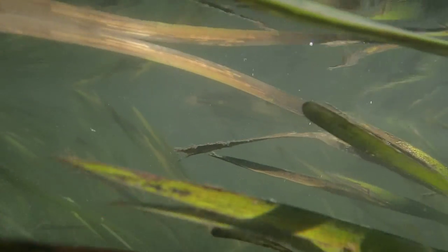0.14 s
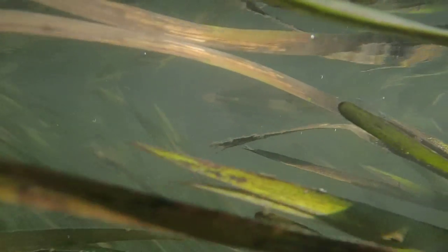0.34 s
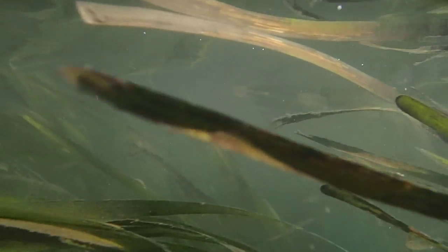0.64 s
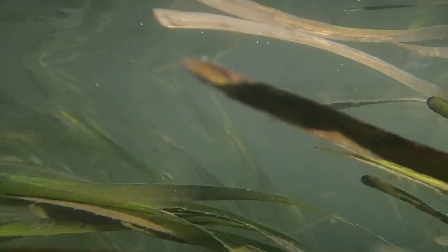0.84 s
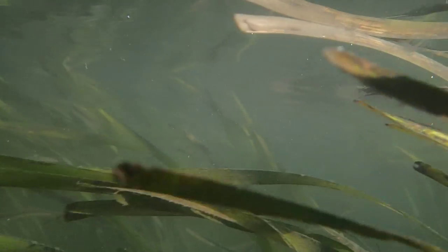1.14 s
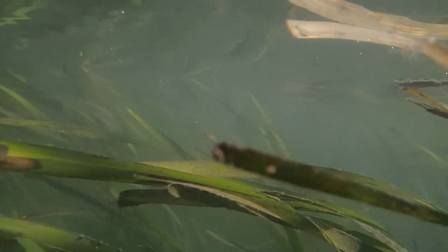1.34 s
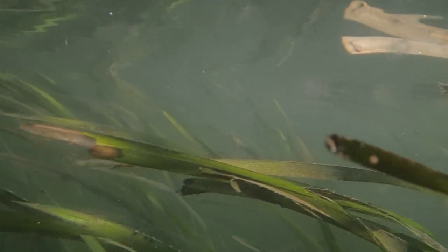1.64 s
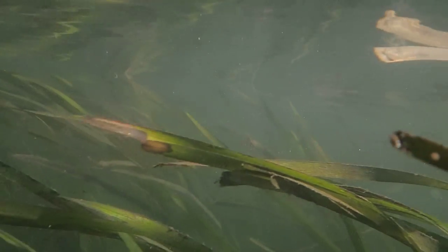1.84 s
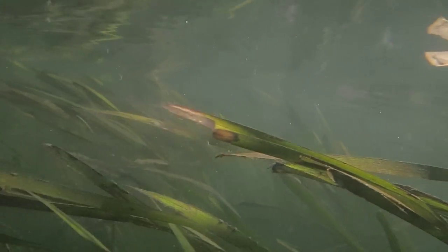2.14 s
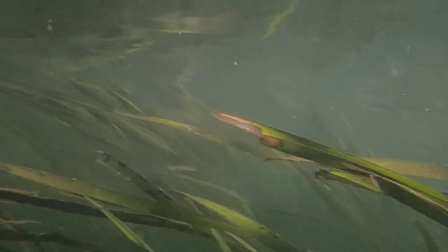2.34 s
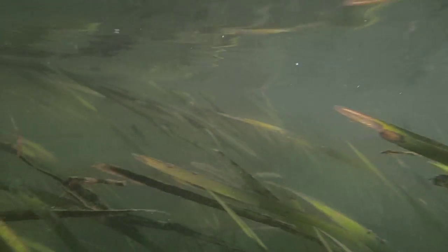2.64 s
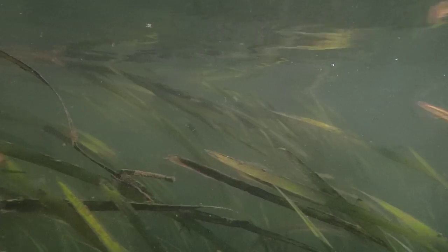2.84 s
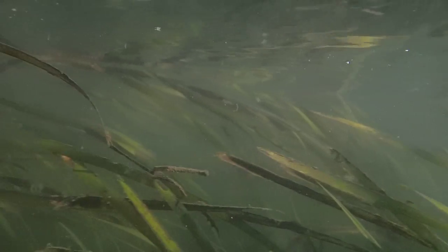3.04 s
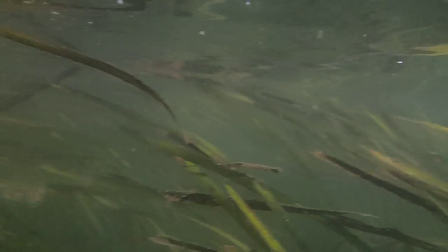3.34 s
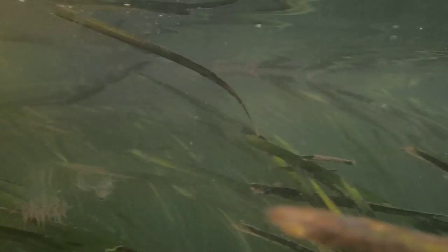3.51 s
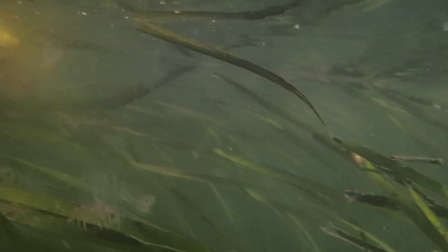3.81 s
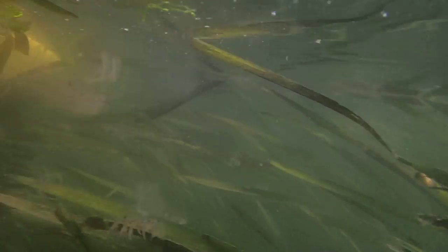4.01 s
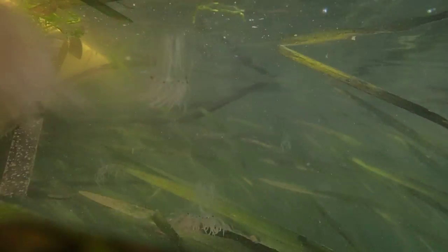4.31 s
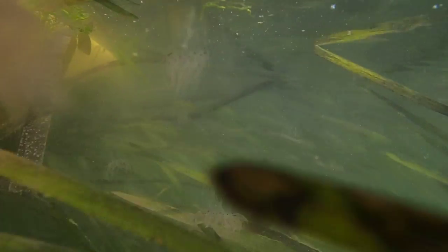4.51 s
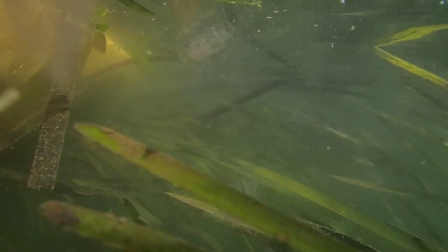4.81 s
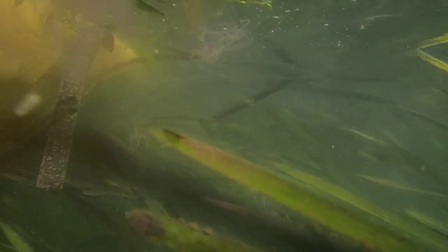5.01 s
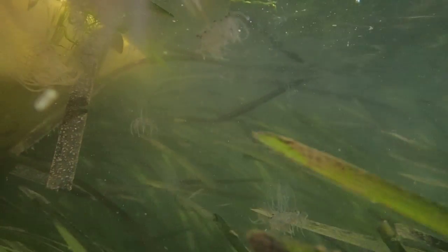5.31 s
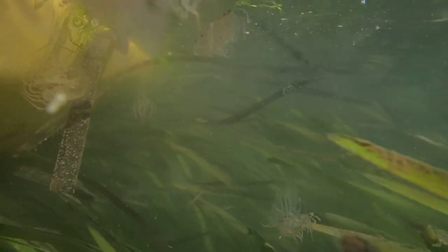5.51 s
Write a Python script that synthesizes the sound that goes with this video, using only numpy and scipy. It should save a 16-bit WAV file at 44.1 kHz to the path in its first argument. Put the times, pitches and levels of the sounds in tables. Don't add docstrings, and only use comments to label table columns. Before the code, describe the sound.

Close stereo microphones in a submerged camera hear mostly their own machine: a steady boxy hum, rapid shuddering ticks, thin whine and light hiss, stronger on the right. Long grass leans on the case with low thuds and brief rumbling scrapes. Sharp plasticky knocks come at about 2.4 and 2.8 seconds, with momentary drops in level. Deeper sweeps and small taps follow, ending with the motor still fluttering.

```python
import sys
import numpy as np
from scipy import signal
from scipy.io import wavfile
from scipy.ndimage import uniform_filter1d

SR = 44100
rng = np.random.default_rng(int(sys.argv[2]) if len(sys.argv) > 2 else 0)


def unload_audio(sound):
    columns = np.transpose(np.atleast_2d(sound))
    steps = np.round(np.clip(columns, -1, 1) * 32767)
    wavfile.write(sys.argv[1], SR, steps.astype(np.int16))


def linear_from_db(decibels):
    return 10 ** (np.asarray(decibels, float) / 20)


N = 249606

HISS_DB = [-57.8, -54.2]
# frequency in Hz, level in dB per Hz.
HISS_COLOUR = [(500, 2), (2500, 5), (3300, 4), (5000, 1.5), (6300, 3), (7300, 3.5), (8000, 0), (16000, -1)]

# frequency in Hz, level in dB per Hz.
PUSH_COLOUR = [(15, -32), (30, -17), (60, -2), (90, 9), (140, -15), (250, -38)]
# frequency in Hz, level in dB per Hz.
RUMBLE_COLOUR = [(50, -52), (100, -9.5), (175, 2.1), (260, -4.5), (400, -2), (800, -15)]
# frequency in Hz, level in dB per Hz.
SCRAPE_COLOUR = [(700, 1), (1300, 10.5), (1900, 3.5), (3100, -2.5), (4500, -11.5), (9000, -8)]
# middle in seconds, half length in seconds, rumble in dB, scrape in dB.
SWEEPS = [(.45, 0.26, -72, -67), (0.726, 0.013, -36, -49), (.755, 0.0096, -40, -63),
          (0.78, 0.077, -41.5, -56), (0.993, 0.066, -47, -65), (1.75, 0.58, -53, -69),
          (2.1, 0.052, -60, -71), (2.693, 0.035, -42, -70), (2.87, 0.1, -34.5, -74), (3.2, 0.13, -43, -71),
          (3.54, 0.14, -28.5, -59), (3.965, .15, -49, -82), (4.193, 0.18, -30.5, -57.5),
          (4.735, 0.14, -36.5, -63), (4.912, 0.041, -38, -63), (5.13, 0.092, -44, -71)]
PUSH_DB, STILL_SCRAPE_DB = -61.5, -62

# start in seconds, level in dB, left over right in dB.
BUMPS = [(0.327, -49, -12.0), (0.527, -39, 18.5), (0.652, -34, 26.0), (0.723, -30.5, 7), (0.764, -28, -24),
         (0.993, -39, 0), (1.949, -51, 6), (2.084, -36, -13), (2.34, -43, -10), (2.678, -40, 2.5),
         (2.779, -38, 8), (2.921, -34, -16), (3.419, -46, 5.5), (3.571, -37, 18.0), (4.046, -45, 7.0),
         (4.256, -55, 11.5), (4.95, -47, -2)]

# start in seconds, ring in dB, crack in dB, tick in dB.
KNOCKS = [
    (2.4412, -6, -29, -30),
    (2.8082, -9, -30, -50),
    (2.857, -6, -20, -39),
    (2.986, -50, -56, -45),
    (4.6679, -18, -26, -31.5),
]
# start in seconds, crack in dB, ring in dB.
TAPS = [(1.0199, -34.5, -28), (2.700, -54, -21.5), (3.115, -37, -29), (3.8845, -50, -42),
        (4.1717, -34, -24), (4.7648, -46, -29), (5.0666, -37, -40), (5.342, -46, -43), (5.405, -34, -40),
        (5.5627, -41, -49)]
# start in seconds, level in dB, low note in Hz, high note in Hz.
SNAPS = [
    (.727, -46, 1850, 2600),
    (2.4413, -19.5, 1960, 3050),
    (2.8086, -33, 2250, 2800),
    (2.8568, -25.5, 2340, 2700),
    (4.6686, -43, 2300, 3000),
]
# frequency in Hz, level in dB, time to fade by 60 dB in seconds.
CRACK = [(1180, 4.7, 0.0071), (1600, -2, 0.0043)]
# frequency in Hz, level in dB, time to fade by 60 dB in seconds.
TICK = [(4570, -5, 0.0044), (6700, 0.5, 0.0037), (11000, -9, .002)]
# frequency in Hz, level in dB, time to fade by 60 dB in seconds.
THUMP = [(180.6, -1, 0.064)]
# frequency in Hz, level in dB, time to fade by 60 dB in seconds.
RING_LEFT = [(470, -4.5, 0.066), (760, -13, 0.021)]
# frequency in Hz, level in dB, time to fade by 60 dB in seconds.
RING_RIGHT = [(464, -2., 0.091), (776, 5.5, 0.011)]
TAP_TICK_DB = -22.0
THUMP_SHARE, THUMP_DB = 0.7, -7.5
SNAP_T60_S, LOW_NOTE_DB = 0.0053, -5

PICTURES_PER_S = 30000 / 1001
RESTS = [1, 3, 9, 11, 20, 29, 35, 37, 39, 72, 74, 76, 98, 101, 103, 105, 110, 112, 156, 158, 160, 162, 164,
         167, 169]
# time in seconds, start tick in dB, settling shudder in dB.
LOAD = [(0, -37, -36), (.8, -30.5, -33.5), (1.6, -29.5, -31), (2.4, -32.5, -29.5), (2.7, -33.5, -30),
        (3.5, -30, -27), (4, -31.5, -23.5), (5., -29, -22.5), (5.3, -27, -27), (5.66, -26.5, -27.5)]
# frequency in Hz, level in dB, time to fade by 60 dB in seconds.
START_MODES = [(587, -1., .045), (850, 0.1, .013), (1048, -1., .03)]
# frequency in Hz, level in dB, time to fade by 60 dB in seconds.
SETTLE_MODES = [(586.3, 0.1, .1), (740, -12, .03), (1030, -12.5, 0.034), (1285, -14.5, .04)]
WHINE_DB = [-71.5, -53]
WHINE_HZ = 7520
CASE_EDGE_HZ = 1250

# time in seconds, level in dB, main resonance in Hz.
HUM = [(0, -28.5, 470), (.25, -26.5, 510), (.55, -29, 457), (1.15, -27.5, 437), (1.6, -29.5, 448),
       (1.85, -28.5, 483), (2.15, -28.5, 449), (2.7, -28, 465), (3.3, -29, 439), (4.0, -27.5, 444),
       (4.4, -28, 432), (4.9, -27, 431), (5.3, -27.5, 464), (5.66, -26.5, 448)]
# frequency in Hz, level in dB per Hz.
HUM_COLOUR = [(90, -27.5), (150, -18), (190, -13), (280, -12), (400, -3.5), (452, 3.5), (520, -5),
              (600, -9), (680, -14), (875, -26.5), (1060, -26.5), (1200, -38), (1460, -47.5), (2400, -51.5)]
# time in seconds, level in dB.
DRONE = [(0, -52), (.5, -55), (.7, -68), (2.4, -56.5), (3.2, -54), (5.66, -72)]
# frequency in Hz, level in dB per Hz.
DRONE_COLOUR = [(95, -53), (112, -17), (119, 0.1), (126, -6), (150, -21)]
HUM_ALIKE, HUM_LEFT_DB = 0.86, -4.5
HUM_LIFT_DB, FULL_CONTACT_DB = 2.5, -28.5
REST_HZ = 452
SLIDE_EDGE_HZ = 450
LEFT_LAG = 3

# start in seconds, depth in dB, recovery in seconds.
GAIN_DROPS = [
    (.768, 1.5, 0.065),
    (2.4525, 16, 0.05),
    (2.8665, 10.5, 0.042),
]
NOTCH_HZ, NOTCH_WIDTH_HZ = 4023, 730


def curve(rows):
    s, *columns = np.transpose(rows)
    return [np.interp(np.arange(N) / SR, s, column) for column in columns]


def noise(colour, alike=0.0, patchy_db=0.0, stretch=0.98):
    frames = N // 512 + 5
    hz = np.fft.rfftfreq(2048, 1 / SR)
    colour_hz, colour_db = np.transpose(colour)
    a, b, c, d, patches = rng.standard_normal((frames, 1025, 5)).T
    patches = uniform_filter1d(patches, size=8, axis=0)
    patches = uniform_filter1d(patches, size=5, axis=1)
    alike = np.clip(alike, 0, 1)
    right = a + 1j * b
    left = alike * right + np.sqrt(1 - alike ** 2) * (c + 1j * d)
    spectrum = np.array([left, right])
    slide = np.interp(np.arange(frames) * 512, np.arange(N), stretch * np.ones(N))
    slide_share = 1 / (1 + (hz[:, None] / SLIDE_EDGE_HZ) ** 10)
    source_hz = hz[:, None] / slide ** slide_share
    shape_db = np.interp(np.log(source_hz + 1), np.log(colour_hz), colour_db, left=-90, right=-90)
    spectrum *= linear_from_db(shape_db + patchy_db * patches / patches.std())
    x = signal.istft(spectrum, nperseg=2048, noverlap=1536)[1][:, :N]
    return x / x.std()


def ring(modes, rise_s, turn=1):
    t = np.arange(4096) / SR
    lines = 0
    for k, (hz, db, t60) in enumerate(modes):
        fade = linear_from_db(db - 60 * t / t60)
        lines = lines + turn ** k * fade * np.sin(2 * np.pi * hz * t)
    return lines * (1 - np.exp(-t / rise_s))


def strike(times, sizes, sound):
    train = np.zeros(N)
    places = np.clip(np.round(times * SR).astype(int), 0, N - 1)
    np.add.at(train, places, sizes)
    return signal.oaconvolve(train, sound)[:N]


def hiss():
    return linear_from_db(np.array(HISS_DB))[:, None] * noise(HISS_COLOUR)


def sweeps():
    s, half_s, rumble_db, scrape_db = np.transpose(SWEEPS)[:, :, None]
    t = np.arange(0, N / SR, 0.002)
    swell = np.exp(-((t - s) / half_s) ** 2)
    pressure = (linear_from_db(rumble_db) * swell).sum(0)
    friction = (linear_from_db(scrape_db) * swell).sum(0)
    return curve(np.transpose([t, pressure, friction]))


def drag():
    pressure, friction = sweeps()
    grain_db = 2.9 * uniform_filter1d(rng.standard_normal(N), size=200) * np.sqrt(200)
    push = linear_from_db(PUSH_DB) * noise(PUSH_COLOUR, alike=0.4, patchy_db=-1.0)
    balance = linear_from_db(np.array([[1.5], [-1.5]]))
    rumble = linear_from_db(1.5) * pressure * noise(RUMBLE_COLOUR, alike=0.1, patchy_db=1.5) * balance
    friction = np.hypot(friction, linear_from_db(STILL_SCRAPE_DB))
    scrape = friction * linear_from_db(grain_db) * noise(SCRAPE_COLOUR, alike=0.09)
    return push + rumble + scrape


def bumps():
    s, db, pan_db = np.transpose(BUMPS)
    swing = ring([(60, 4.1, 0.14), (93.8, 5.4, 0.2)], 0.0096)
    sign = rng.choice([-1, 1], (len(s), 2))
    left = strike(s, sign[:, 0] * linear_from_db(db + np.minimum(pan_db, 0)), swing)
    right = strike(s, sign[:, 1] * linear_from_db(db + np.minimum(-pan_db, 0)), swing)
    return np.array([left, right])


def knocks():
    taps = [(s, ring_db, db, db + TAP_TICK_DB) for s, db, ring_db in TAPS]
    s, ring_db, crack_db, tick_db = np.transpose(list(KNOCKS) + taps)
    crack = strike(s + 0.0005, linear_from_db(crack_db), ring(CRACK, 0.0002, turn=-1))
    crack += strike(s + 0.0005, linear_from_db(tick_db), ring(TICK, 0.0002, turn=-1))
    for at, db, low_hz, high_hz in SNAPS:
        notes = [(low_hz, db + LOW_NOTE_DB, SNAP_T60_S), (high_hz, db, SNAP_T60_S)]
        crack += strike(np.array(at + 0.0005 - 0.0005), 1, ring(notes, 0.0002))
    left = strike(s + 0.0003, linear_from_db(ring_db), ring(RING_LEFT, 0.0003))
    right = strike(s + 0.0017, linear_from_db(ring_db), ring(RING_RIGHT, 0.0007))
    thump = strike(s + 0.0004, linear_from_db(THUMP_SHARE * ring_db + THUMP_DB), ring(THUMP, 0.0012))
    return np.array([0.9 * crack - left + thump, crack - right + 0.4 * thump])


def focus_motor():
    picture = np.arange(int(N / SR * PICTURES_PER_S) + 2)
    chance = rng.standard_normal((len(picture), 4))
    back = picture % 2 == 0
    start = picture / PICTURES_PER_S - 0.0078 + 0.0022 * back
    moves = 1 - np.isin(picture, RESTS)

    s, start_db, settle_db = np.transpose(LOAD)
    tick_at = start + 0.0008 + 0.00012 * chance[:, 0]
    tick_size = linear_from_db(np.interp(start, s, start_db) + 1.3 * chance[:, 1])
    ticks = strike(tick_at, tick_size, ring(START_MODES, 0.0008, turn=-1))
    settle_at = start + 0.0162 - 0.0048 * back + 0.0001 * chance[:, 2]
    settle_size = linear_from_db(np.interp(start, s, settle_db) + 1.5 * chance[:, 1])
    ticks += strike(settle_at, settle_size, ring(SETTLE_MODES, 0.004))
    ticks = signal.sosfilt(signal.butter(6, CASE_EDGE_HZ, fs=SR, output="sos"), ticks)

    turning = np.cumsum(strike(start, moves, [1]) - strike(start + 0.0232, moves, [1]))
    turning = uniform_filter1d(turning, size=60)
    step = np.clip(np.searchsorted(start, np.arange(N) / SR) - 1, 0, None)
    wobble_hz = 277.0 * uniform_filter1d(rng.standard_normal(N), size=300)
    hz = WHINE_HZ + 5.8 * chance[step, 3] + wobble_hz
    whine = np.sqrt(2) * turning * np.sin(2 * np.pi * np.cumsum(hz) / SR)
    coil = signal.lfilter(*signal.iirpeak(6295, 90, SR), rng.standard_normal(N))
    high = linear_from_db(np.array(WHINE_DB))[:, None] * whine + linear_from_db(-61.0) * coil
    low = np.array([linear_from_db(-4.0) * np.roll(ticks, LEFT_LAG), ticks])
    return low + high * [[-1], [1]]


def hum():
    drone = linear_from_db(curve(DRONE)[0] + 6.0) * noise(DRONE_COLOUR, alike=0.94)
    pressure = sweeps()[0]
    contact = np.sqrt(np.minimum(pressure / linear_from_db(FULL_CONTACT_DB), 1))
    level_db, hz = curve(HUM)
    left, right = noise(HUM_COLOUR, alike=HUM_ALIKE, patchy_db=-0.8, stretch=hz / REST_HZ)
    ports = np.array([linear_from_db(HUM_LEFT_DB) * np.roll(left, LEFT_LAG), right])
    return drone + linear_from_db(level_db + HUM_LIFT_DB * contact + 2.0) * ports


def scene():
    return hiss() + drag() + bumps() + knocks() + focus_motor() + hum()


def top_cut(x):
    return signal.sosfilt(signal.butter(12, 15750, fs=SR, output="sos"), x)


def record(dry):
    t = np.arange(N) / SR
    drop_db = np.zeros(N)
    for s, depth_db, recovery_s in GAIN_DROPS:
        since = np.maximum(t - s, 0)
        drop_db += depth_db * (t > s) * np.exp(-(since / recovery_s) ** 0.7)
    notched = signal.lfilter(*signal.iirnotch(NOTCH_HZ, NOTCH_HZ / NOTCH_WIDTH_HZ, SR), dry)
    gain = linear_from_db(-uniform_filter1d(drop_db, size=400))
    mix = (0.72 * notched + 0.22 * dry) * gain
    return top_cut(mix)


dry = scene()
out = record(dry)
unload_audio(out)
```